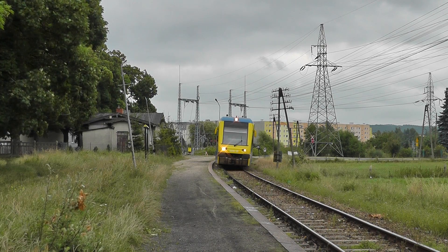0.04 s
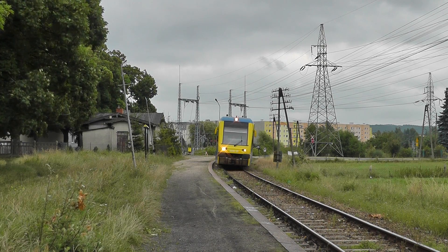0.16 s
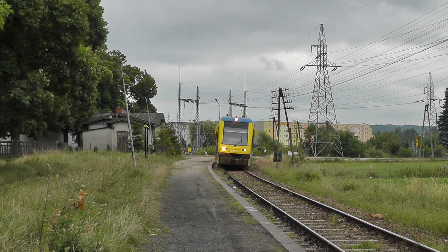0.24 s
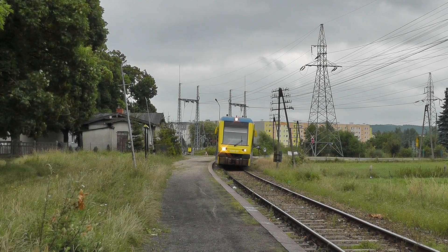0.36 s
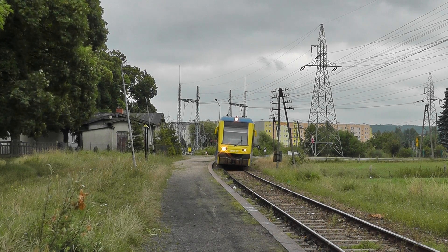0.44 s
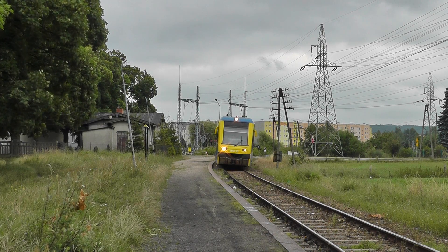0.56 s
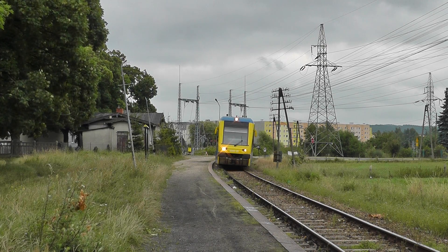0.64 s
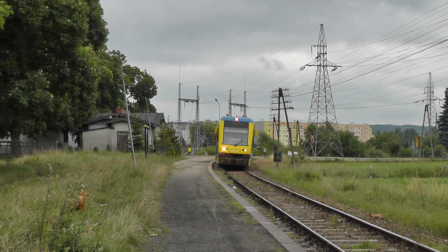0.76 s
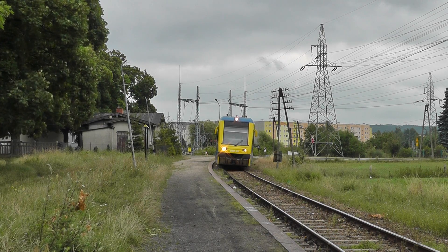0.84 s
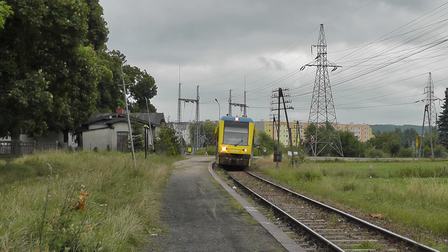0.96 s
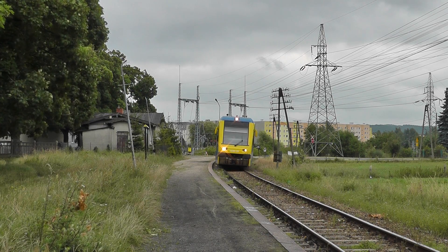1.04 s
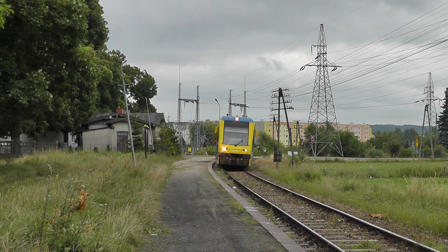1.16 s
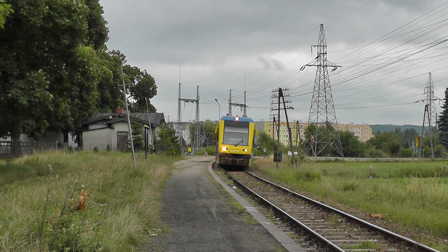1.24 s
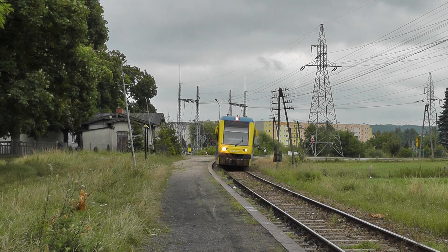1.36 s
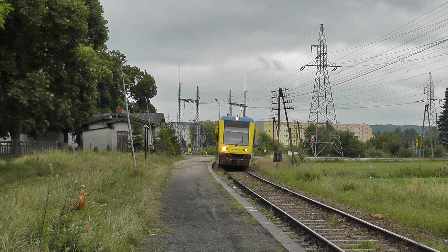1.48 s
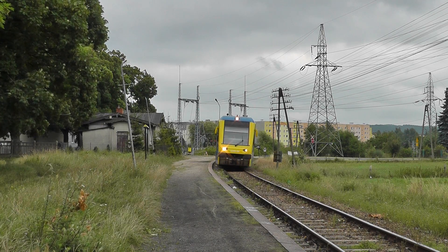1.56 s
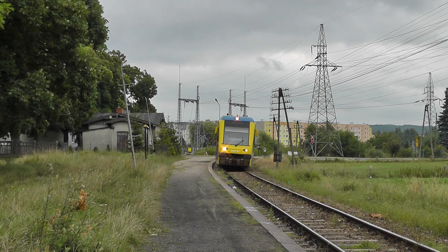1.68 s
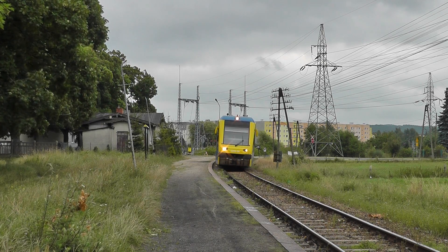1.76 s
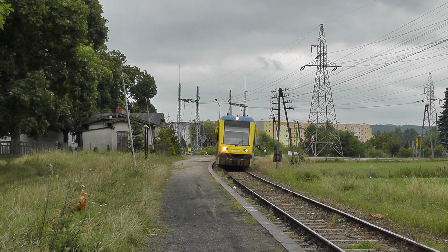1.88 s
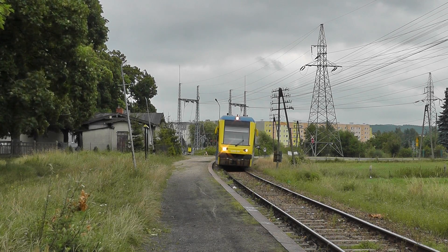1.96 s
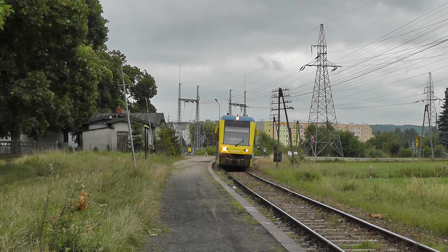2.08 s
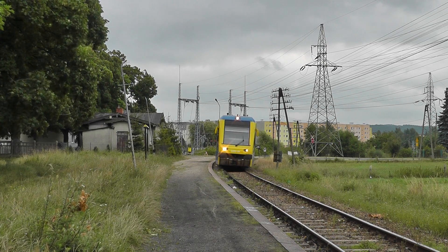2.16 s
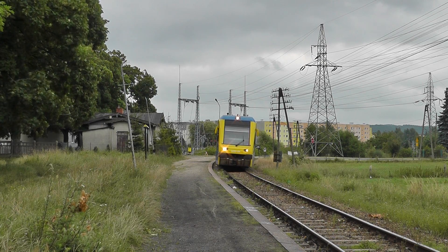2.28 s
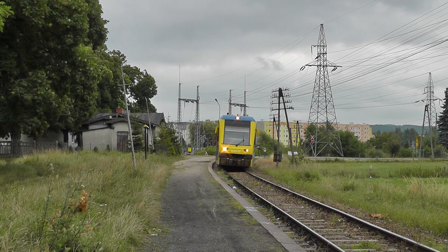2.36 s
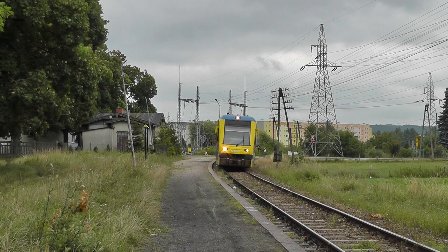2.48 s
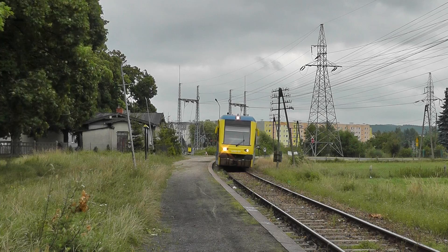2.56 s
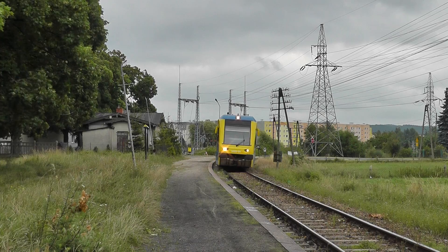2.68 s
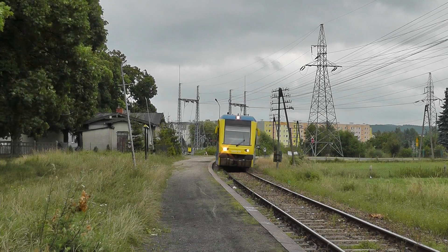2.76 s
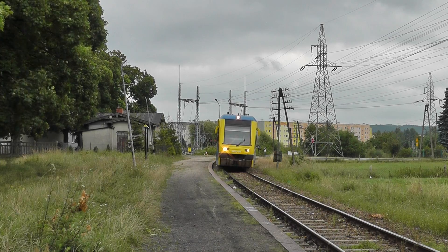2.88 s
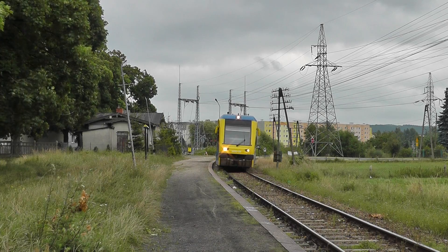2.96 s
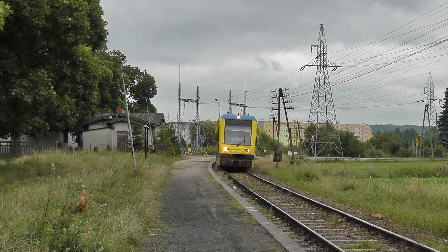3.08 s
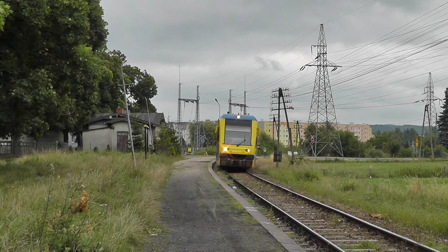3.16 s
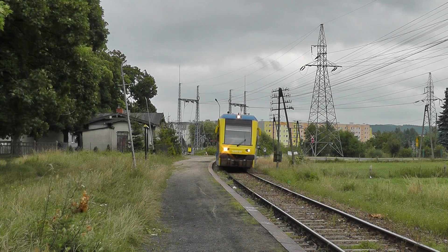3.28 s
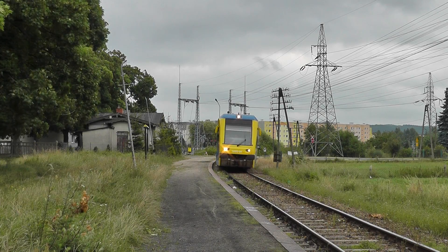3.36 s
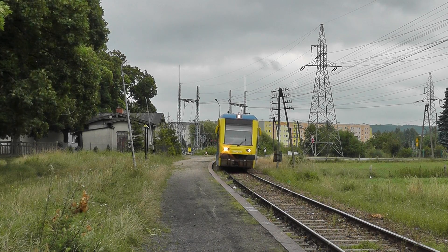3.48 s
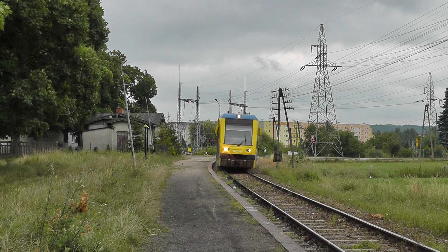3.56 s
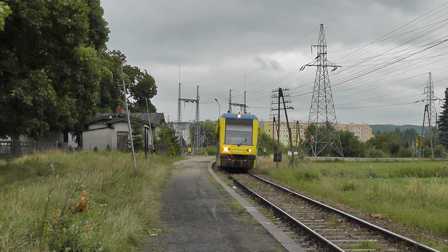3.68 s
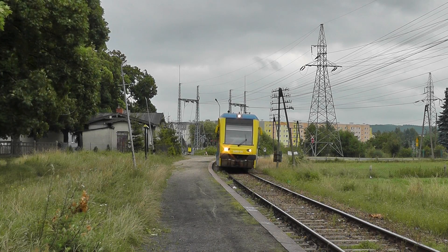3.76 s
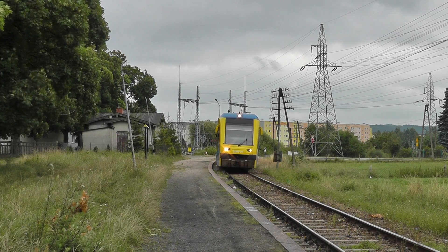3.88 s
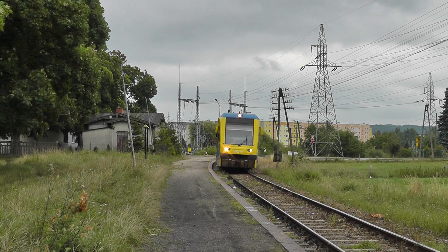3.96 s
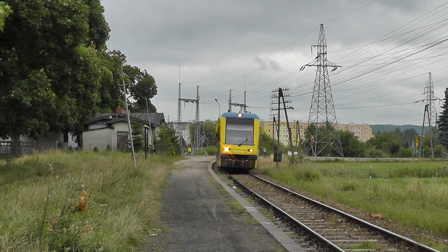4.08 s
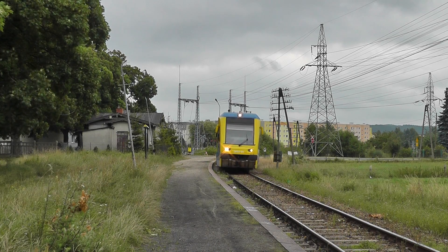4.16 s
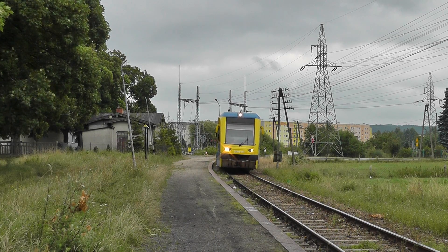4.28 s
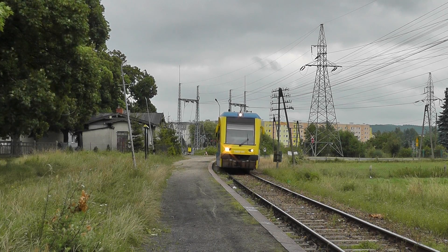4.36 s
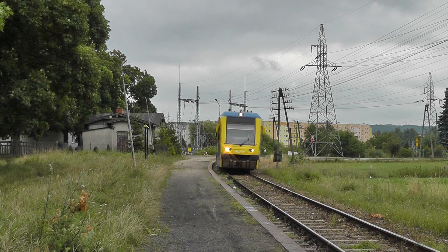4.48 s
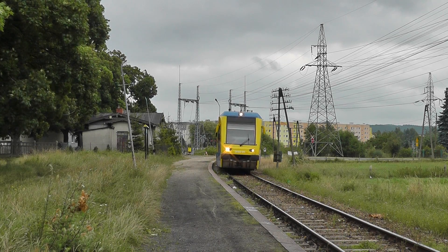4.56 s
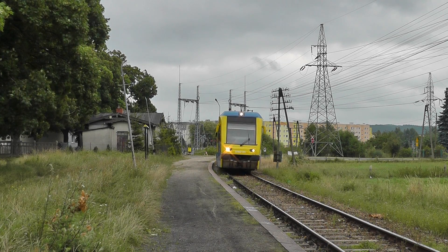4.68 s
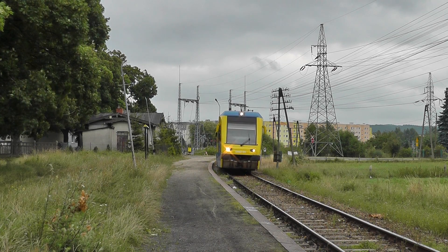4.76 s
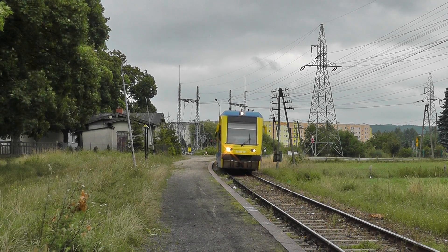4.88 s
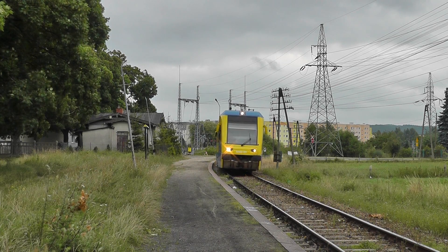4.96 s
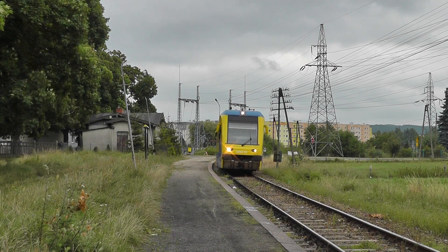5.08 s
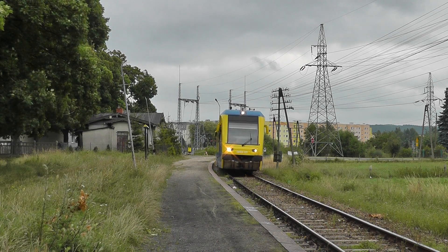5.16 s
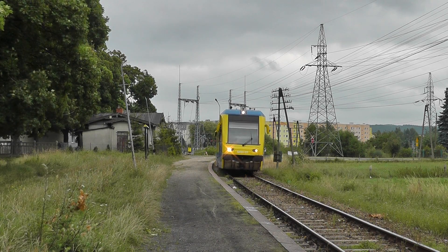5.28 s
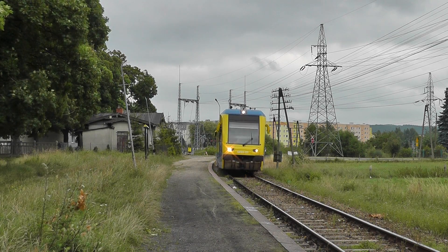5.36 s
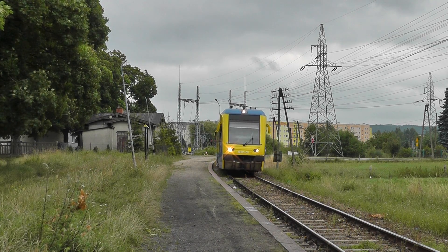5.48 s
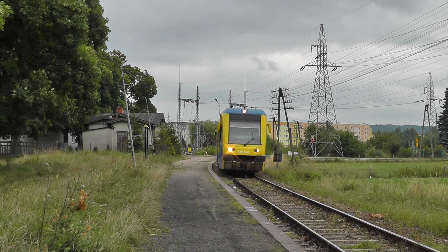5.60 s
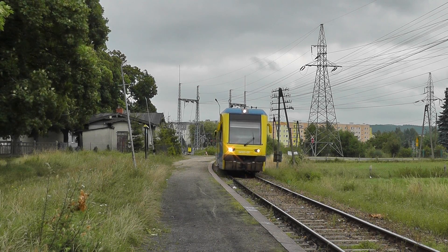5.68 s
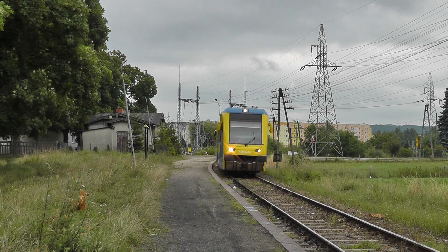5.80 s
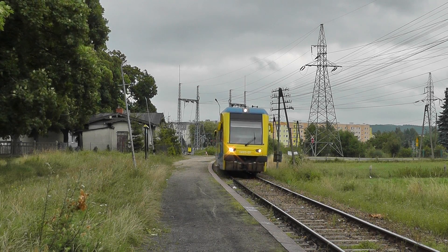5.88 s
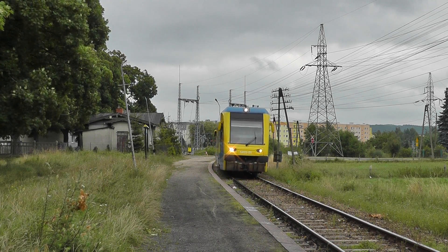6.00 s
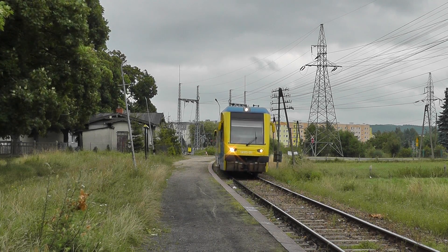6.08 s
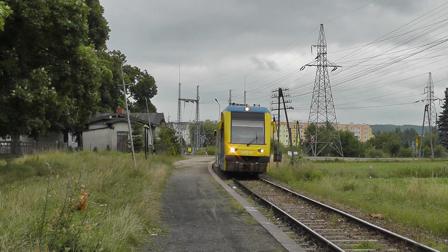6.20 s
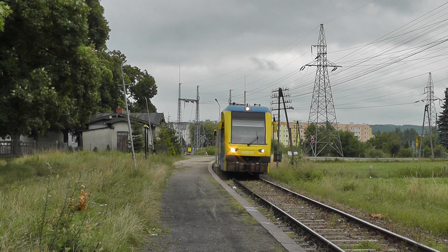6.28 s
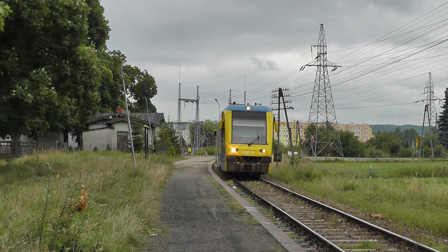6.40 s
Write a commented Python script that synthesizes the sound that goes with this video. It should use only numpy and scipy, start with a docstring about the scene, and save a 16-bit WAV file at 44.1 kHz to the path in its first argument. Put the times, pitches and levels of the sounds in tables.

```python
"""A diesel railcar pulls away and comes slowly nearer along a country platform: its engine revs up and holds.
Exhaust tones follow the firing rate and boom in turn; pulsing noise bands make the rumble, clatter and rasp. A
smeared tone is the turbocharger, bursts of noise are an air valve, and a decaying low sine is a thud. Jackdaws
near and far and a small bird, stacks of falling harmonics, call over a faint rustle. Hut walls and trees answer
the near jackdaws with a short echo; the trees answer the farther calls too."""
import sys
import numpy as np
from scipy import signal
from scipy.fft import rfft, irfft, next_fast_len
from scipy.io import wavfile
from scipy.ndimage import uniform_filter1d, map_coordinates

SR = 44100
rng = np.random.default_rng(int(sys.argv[2]) if len(sys.argv) > 2 else 0)


def generate_wav(signal):
    """Clip the signal to [-1, 1] and save it as 16-bit WAV at the path in sys.argv[1]."""
    frames = np.transpose(np.atleast_2d(signal))
    scaled = np.clip(frames, -1, 1) * 32767
    pcm = np.round(scaled).astype(np.int16)
    wavfile.write(sys.argv[1], SR, pcm)


N = 283563

# engine speed: (time_s, firing_rate_hz)
FIRING_RATE = [(0, 55.8), (2.4, 73.49), (3.25, 80.57), (4, 83.43), (5.5, 86.3), (6.43, 86.83)]
# turbocharger speed: (time_s, blade_tone_hz)
BLADE_TONE = [(0, 7900), (1.3, 8240), (2.3, 10200), (2.85, 11020), (3.4, 11500), (3.82, 11700),
              (4.02, 13500), (4.3, 14500), (6.43, 14900)]


def amp(db):
    """Decibels to gain."""
    return 10 ** (np.asarray(db) / 20)


def unit(x):
    """Scale to rms 1."""
    return x / np.sqrt(np.mean(x ** 2) + 1e-20)


def along(points, hz):
    """Read (Hz, value) points on a log frequency axis."""
    point_hz, values = np.transpose(points)
    return np.interp(np.log(hz + 1), np.log(point_hz + 1), values)


def curve(rows):
    """Turn (time_s, value) rows into one value per sample."""
    times, values = np.transpose(rows)
    return np.interp(np.arange(N) / SR, times, values)


def wobble(rate, size=N):
    """A smooth random curve with rate knots a second."""
    knots = rng.standard_normal(int(size * rate / SR) + 4)
    return map_coordinates(knots, [np.arange(size) * rate / SR])


def filtered(x, response):
    """Shape x by a gain that is a function of frequency."""
    m = next_fast_len(N + SR // 2)
    return irfft(rfft(x, m) * response(np.fft.rfftfreq(m, 1 / SR)), m)[..., :N]


def burst(s, rise, t60):
    """Envelope that rises at time s and dies away."""
    t = np.maximum(np.arange(N) / SR - s, 0)
    return (1 - np.exp(-t / rise)) * np.exp(-np.log(1000) * t / t60)


def rush(spectrum, patchy_db, source=None):
    """Coloured stereo noise, its mid at rms 1, with patches of random gain from the moving air on its way."""
    # stereo width: (pitch_hz, left_right_likeness)
    likeness = [(30, .6), (60, 0.93), (83, 0.59), (110, 0.74), (160, 0.83), (220, 0.52), (300, 0.26),
                (420, 0.79), (580, 0.6), (810, 0.79), (1120, 0.59), (1540, 0.67), (2140, 0.54),
                (2960, 0.72), (4090, 0.93), (5660, 1), (7830, 0.94), (10800, 0.1), (15000, 0.53)]
    if source is None:
        source = rng.standard_normal((2, N))
    z = signal.stft(source, nperseg=512)[2]
    patches = uniform_filter1d(rng.standard_normal(z.shape[1:]), size=4, axis=0)
    patches = uniform_filter1d(patches, size=18, axis=1)
    pair = signal.istft(z * amp(patchy_db * unit(patches)), nperseg=512)[1][:, :N]

    def mid_side_gain(hz):
        turn = np.arccos(np.clip(along(likeness, hz), -1, .98)) / 2
        # a steep roll-off follows the last point of the spectrum
        colour = amp(along(spectrum, hz)) / (1 + (hz / spectrum[-1][0] / 1.07) ** 8)
        return colour * [np.cos(turn), np.sin(turn)]

    mid, side = filtered(pair, mid_side_gain)
    return np.array([mid + side, mid - side]) / np.std(mid)


def firings():
    """Count of cylinder firings so far; the crank speed wavers a little."""
    return np.cumsum(curve(FIRING_RATE)) / SR + 0.0048 * wobble(20)


def nearness_db():
    """Level gained by the railcar as it gathers speed towards the listener."""
    start_m, speed_m_per_s, accel_m_per_s2 = 59.6, 1.32, 0.69
    t = np.arange(N) / SR
    distance = start_m - speed_m_per_s * t - accel_m_per_s2 * t ** 2 / 2
    return 20 * np.log10(start_m / np.maximum(distance, 1))


def engine_tone(cycle, order, rough_db, blur):
    """A sine at a multiple of the firing rate, wavering in level and phase."""
    level = np.sqrt(2) * amp(rough_db * wobble(14))
    return level * np.sin(2 * np.pi * (order * cycle + rng.random()) + blur * wobble(17))


def exhaust(cycle):
    """The pipe drones at the firing rate; higher orders boom in turn and stand out at full revs."""
    # exhaust drone: (time_s, level_db before a 0.2 dB trim)
    drone_levels = [(0.06, -35.5), (0.8, -34), (0.92, -44.5), (1.03, -37.5), (1.71, -32.5), (2.45, -39),
                    (2.46, -47), (2.51, -37), (3.18, -35), (3.31, -41), (3.41, -33.5), (3.48, -45),
                    (3.69, -35), (3.8, -40), (3.99, -31), (4.52, -30.5), (4.94, -21), (6.36, -16.5)]
    # engine orders as multiples of the firing rate
    multiples = {"second": 2, "cylinder imbalance": 2.5, "fan": 2.69, "third": 3,
                 "low hum": 14 / 3, "middle hum": 7.5, "high hum": 10}
    # order levels: (name, level_db at the starting distance, gain_db at full revs)
    order_levels = [("second", -51, 6), ("cylinder imbalance", -59, 12), ("fan", -59, 8), ("third", -65, 4),
                    ("low hum", -63, 11), ("middle hum", -60.5, 3), ("high hum", -65, 4)]
    # resonances of pipe or body: (order_name, firing_rate_hz, half_width_hz, level_db at the starting distance)
    resonances = [("fan", 63, 3, -40.5), ("second", 64.5, 1.2, -44), ("second", 68.6, .8, -34.5),
                  ("second", 71.06, 1.43, -32), ("second", 75.1, 1.13, -35), ("second", 82, 4.2, -44.5),
                  ("third", 72.2, .7, -43.5)]
    rate = curve(FIRING_RATE)
    full_revs = np.clip((rate - 84.3) / (86.3 - 84.3), 0, 1)  # firing rates in Hz
    drone = amp(curve(drone_levels) - 0.2) * engine_tone(cycle, 1, rough_db=.2, blur=.015)
    orders = np.zeros(N)
    for name, db, more_db in order_levels:
        boom = sum(amp(boom_db) * np.exp(-((rate - hz) / width) ** 2)
                   for which, hz, width, boom_db in resonances if which == name)
        level = np.hypot(amp(db + more_db * full_revs), boom)
        multiple = multiples[name]
        orders += level * engine_tone(cycle, multiple, rough_db=1, blur=0.047 * multiple)
    return (drone + amp(nearness_db()) * orders) * np.ones((2, 1))  # same in both channels


def beat(cycle, depth, uneven):
    """Gain that swells at every firing; a strong, weak, medium pattern runs twice through the six cylinders."""
    cylinders = np.array([1, -1, 0, 1, -1, 0])
    strength = 1 + uneven * cylinders[np.floor(cycle).astype(int) % len(cylinders)]
    return unit(1 + depth * strength * np.sin(np.pi * cycle) ** 4)


def rattle(cycle, repeating, size=3072):
    """White noise of which a share repeats every six firings, as the same valves and gears strike again."""
    pattern = rng.standard_normal((2, size))
    place = cycle / 6 % 1 * size
    again = np.array([map_coordinates(p, [place], mode="grid-wrap") for p in pattern])
    share = np.clip(repeating, 0, 1)
    return np.sqrt(share) * again + np.sqrt(1 - share) * rng.standard_normal((2, N))


def loudness(start_db, per_effort_db, per_nearness_db):
    """Gain of an engine layer, following effort and nearness by so many dB per dB."""
    # engine effort, told by the injector rasp: (time_s, rasp_level_db)
    rasp_levels = [(0.5, -54.5), (2.25, -51), (2.46, -52), (3.68, -46.5), (3.88, -44), (5.01, -40),
                   (5.08, -37.5), (6.36, -37)]
    near_db = nearness_db()
    effort_db = curve(rasp_levels) - near_db
    return amp(start_db + per_effort_db * (effort_db - effort_db.min()) + per_nearness_db * near_db)


def engine_rumble(cycle):
    """Low noise that pulses with the firings and is weaker at low revs."""
    # rumble colour: (pitch_hz, relative_db per Hz)
    spectrum = [(20, -24), (40, -18), (58, -6), (90, 0), (130, 1.5), (180, -0.5), (230, -2.5), (290, -8),
                (350, -8), (410, -6.5), (470, -8), (560, -19.5), (800, -47)]
    low_revs_db = 0.2 * np.minimum(curve(FIRING_RATE) - 64.3, 0)  # 0.2 dB per Hz below 64.3 Hz
    level = loudness(-39.5, per_effort_db=-.12, per_nearness_db=1.76) * amp(low_revs_db + .7 * wobble(7))
    return level * rush(spectrum, patchy_db=0.5) * beat(cycle, depth=0.13, uneven=0.24)


def engine_bay(cycle):
    """Middle-pitched noise of the engine bay, partly repeating with the valves and gears."""
    # bay colour: (pitch_hz, relative_db per Hz)
    spectrum = [(350, -27), (520, -7), (590, -5.5), (690, 0), (780, -2), (855, 1), (930, -3.5),
                (1030, -4.5), (1130, -2), (1300, -17), (1800, -46)]
    level = loudness(-48.5, per_effort_db=0.41, per_nearness_db=0.22)
    noise = rush(spectrum, patchy_db=0.4, source=rattle(cycle, repeating=0.25))
    return level * noise * beat(cycle, depth=0.1, uneven=0.26)


def block_clatter(cycle):
    """The block clatters: partly repeating noise, uneven from cylinder to cylinder."""
    # clatter colour: (pitch_hz, relative_db per Hz)
    spectrum = [(900, -32), (1200, -0.5), (1400, 1.5), (1620, 1), (1800, -4), (1950, 1), (2150, 0),
                (2350, -5), (2800, -53)]
    level = loudness(-52.5, per_effort_db=0.33, per_nearness_db=2.68)
    noise = rush(spectrum, patchy_db=0.6, source=rattle(cycle, repeating=0.2))
    return level * noise * beat(cycle, depth=0.092, uneven=0.46)


def injector_rasp(cycle):
    """Injectors rasp with the firings, very unevenly, in step with effort."""
    # rasp colour: (pitch_hz, relative_db per Hz)
    spectrum = [(2000, -33), (2380, -4.5), (2600, 1), (2880, 0), (3060, -5.5), (3270, -1.5), (3900, -2.5),
                (4500, -8.5), (5100, -10.5), (5700, -17.5), (8000, -28)]
    level = loudness(-54.5, per_effort_db=1, per_nearness_db=1) * amp(.25 * wobble(8))
    return level * rush(spectrum, patchy_db=0.46) * beat(cycle, depth=0.1, uneven=0.86)


def duct():
    """Response of the intake duct, 0-1, as the blade tone climbs through its resonance."""
    resonance_hz, width_hz = 10980, 460
    return 1 / np.hypot(1, 2 * (curve(BLADE_TONE) - resonance_hz) / width_hz)


def intake_air(cycle):
    """Intake air rushes harder as the turbocharger speeds up, with a small lift at the duct resonance."""
    # air colour: (pitch_hz, relative_db per Hz)
    air_spectrum = [(4500, -35), (5700, -10.5), (6500, -2.5), (7800, -1.5), (8800, -4.5), (9800, -7.5),
                    (10600, -5.5), (12200, -13), (13800, -16.5), (15700, -23)]
    # finest hiss colour: (pitch_hz, relative_db per Hz)
    hiss_spectrum = [(7000, -28), (11000, 0), (15700, -8)]
    blade_khz = curve(BLADE_TONE) / 1000
    boost_db = 2.5 * (blade_khz - blade_khz[0])  # 2.5 dB per kHz
    air_db = -62.5 + boost_db + 1 * duct() + nearness_db()
    level = amp(air_db + 0.95 * wobble(6))
    air = level * rush(air_spectrum, patchy_db=1) * beat(cycle, depth=0.1, uneven=.5)
    # the hiss only carries over short distances
    hiss = loudness(-77, per_effort_db=.3, per_nearness_db=4.8) * rush(hiss_spectrum, patchy_db=5.0)
    return air + hiss


def turbo(width_hz):
    """The compressor's blade tone, smeared into a narrow hiss, climbs through the duct's resonance."""
    def smear_gain(f):
        return 1 / np.sqrt((1 + (f / width_hz) ** 2) * (1 + (f / 2500) ** 4))  # wide skirts

    smear = filtered(rng.standard_normal((3, N)), smear_gain)
    stereo_smear = smear[2] + .5 * smear[:2]  # mostly shared by both channels
    blade = np.sin(2 * np.pi * np.cumsum(curve(BLADE_TONE)) / SR)
    level = duct() * amp(-55 + nearness_db() + 0.64 * wobble(14))
    return level * unit(stereo_smear * blade)


def valve():
    """Compressed air spits through a narrow port, leaks on, and spits again with a broader puff on shutting."""
    # jet colour: (pitch_hz, relative_db per Hz)
    jet_spectrum = [(3500, -32), (5500, -18), (6900, -18), (7300, 4), (7900, -8), (8400, 1), (9100, -10),
                    (10300, -9), (11300, -8), (12200, -22), (13900, -16), (15500, -26)]
    # closing puff colour: (pitch_hz, relative_db per Hz)
    puff_spectrum = [(2500, -25), (3700, 2), (7000, -3), (11000, -4), (15500, -14)]
    open_s, shut_s = 1.533, 1.66
    spit_db, leak_db, puff_db = -43.5, -54.5, -43.5
    t = np.arange(N) / SR
    opening = burst(open_s, rise=0.0065, t60=0.17)
    shutting = burst(shut_s, rise=0.0065, t60=0.17)
    leaking = (t > open_s) & (t < shut_s)
    jet = np.hypot(amp(spit_db) * (opening + shutting), amp(leak_db) * leaking)
    puff = amp(puff_db) * shutting
    return jet * rush(jet_spectrum, patchy_db=2) + puff * rush(puff_spectrum, patchy_db=0.5)


def thud():
    """Slack in the running gear is taken up with one dull thud, a decaying low sine."""
    start_s, pitch_hz, level_db = .165, 92, -21
    t = np.arange(N) / SR - start_s
    return amp(level_db) * burst(start_s, rise=0.0029, t60=0.086) * np.sin(2 * np.pi * pitch_hz * t)


def calls(rows, throat, count):
    """Each call is a falling stack of count harmonics through the throat; fast pitch jitter makes it hoarse."""
    out = np.zeros(N + SR)
    for s, length, start_hz, end_hz, db, rough in rows:
        u = np.linspace(0, 1, round(length * SR))
        glide = start_hz + (end_hz - start_hz) * u ** 1.9
        hz = glide * (1 + 0.096 * rough * wobble(1092, size=len(u)))
        phase = 2 * np.pi * np.cumsum(hz) / SR
        voice = sum(amp(along(throat, k * hz)) * np.sin(k * phase + 2 * np.pi * rng.random())
                    for k in range(1, count + 1))
        envelope = np.abs(np.sin(np.pi * u)) ** 0.39
        out[round(s * SR):][:len(u)] += amp(db) * unit(voice * envelope)
    return out[:N]


def birds():
    """Jackdaws call near by; farther jackdaws chatter harshly and a small bird chirps."""
    # jackdaw calls: (start_s, length_s, start_pitch_hz, end_pitch_hz, level_db, roughness 0-1)
    jackdaw_calls = [(.075, 0.056, 1465, 1078, -41, 0.12), (.128, 0.034, 883, 694, -43, .22),
                     (.15, 0.037, 935, 720, -44.5, .25), (.188, .045, 735, 653, -48, .3),
                     (.333, .028, 1146, 1004, -49.5, 0.1), (.355, 0.04, 1363, 906, -55, 0.2)]
    # small bird: (start_s, length_s, start_pitch_hz, end_pitch_hz, level_db, roughness 0-1)
    chirps = [(.835, .022, 5400, 4700, -59, 0.6), (.855, 0.0384, 4350, 4070, -52.5, 0.6),
              (.893, .028, 3750, 3450, -54, 0.6), (1.83, 0.0298, 4450, 4130, -52.5, 0.93),
              (1.852, .03, 3750, 3360, -52, 0.88)]
    # harsh chatter: (start_s, level_db)
    chatter_notes = [(1.405, -49), (1.615, -51.5), (1.728, -48.5), (1.89, -46), (2.205, -44.5),
                     (2.315, -42)]
    # throat resonances: (pitch_hz, relative_db)
    throat = [(700, -25), (1400, -12), (1800, -16), (2200, -5), (2800, -2.5), (3300, -13), (4300, -19),
              (5000, -16), (5800, -24), (6500, -19), (7300, -40), (10000, -60)]
    # throat resonances of the farther jackdaws' harsh calls: (pitch_hz, relative_db)
    harsh_throat = [(600, -28), (1200, -3), (1500, 1), (1800, -15), (2080, 6), (2350, -11), (2700, -6),
                    (3100, -22), (5000, -50)]
    length_s, start_hz, end_hz, roughness = 0.0507, 537.4, 482, 0.94  # shared by all chatter notes
    chatter = [(s, length_s, start_hz, end_hz, db, roughness) for s, db in chatter_notes]
    jackdaws = calls(jackdaw_calls, throat, count=11)
    far_birds = calls(chatter, harsh_throat, count=6) + calls(chirps, throat, count=1)
    return jackdaws, far_birds


def wall_echoes(x):
    """Distinct echoes from the hut walls: delayed, quieter copies."""
    # walls: (delay_s, level_db)
    walls = [(.085, -17), (.135, -14)]
    return sum(amp(db) * np.pad(x, (round(s * SR), 0))[:N] for s, db in walls)


def trees(x):
    """A late, scattered answer from the trees: convolution with decaying noise."""
    # decay: (pitch_hz, t60_s)
    decay_times = [(200, 0.36), (2500, 0.68), (10000, 0.23)]
    hz, t, z = signal.stft(rng.standard_normal((2, SR // 2)), SR, nperseg=256)
    tail = signal.istft(z * amp(-60 * t / along(decay_times, hz)[:, None]), SR, nperseg=256)[1]
    late = np.pad(x, (round(.03 * SR), 0))
    return signal.fftconvolve(late[None], tail / np.linalg.norm(tail[0]), axes=1)[:, :N]


def meadow():
    """Distant leaves and grass: a faint, patchy rustle of noise."""
    # rustle colour: (pitch_hz, relative_db per Hz)
    spectrum = [(200, -1), (900, -2.5), (2500, -22), (4500, -12.5), (7000, -11), (10000, -33), (15700, -15)]
    return amp(-58) * rush(spectrum, patchy_db=2.5)


def scene():
    """The railcar ahead, birds a shade to the left, their echoes, a faint rustle all round."""
    cycle = firings()
    machinery = engine_rumble(cycle) + engine_bay(cycle) + block_clatter(cycle) + injector_rasp(cycle)
    railcar = exhaust(cycle) + machinery + intake_air(cycle) + turbo(width_hz=390) + valve() + thud()
    jackdaws, far_birds = birds()
    direct_birds = (jackdaws + far_birds) * amp([[.5], [-.5]])
    echoes = wall_echoes(jackdaws) + amp(-5.5) * trees(jackdaws) + amp(-12) * trees(far_birds)
    return railcar + direct_birds + echoes + meadow()


def record(dry):
    """The two microphones differ a little in colour; nothing passes above the band limit."""
    # microphone balance: (pitch_hz, left_minus_right_db)
    balance = [(55, 0.5), (78, 0.9), (88, 1.4), (140, 0), (210, -1.5), (330, 1.5), (500, -0.5), (770, 3.5),
               (1170, 2.5), (1790, 1.5), (2740, 3), (4190, 0.6), (6410, -0.5), (9500, 2.5), (12000, -1),
               (15000, -3)]
    top_hz = 15750

    def response(hz):
        return amp(along(balance, hz) * np.array([[.5], [-.5]])) * (hz < top_hz)

    return filtered(dry, response)


dry = scene()
out = record(dry)
generate_wav(out)
```